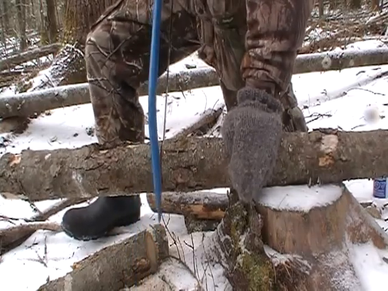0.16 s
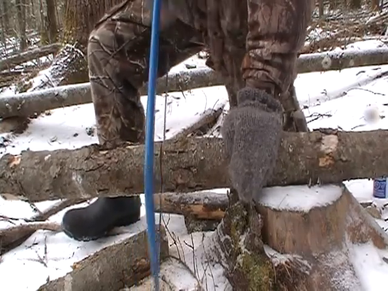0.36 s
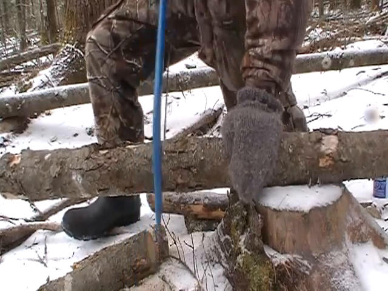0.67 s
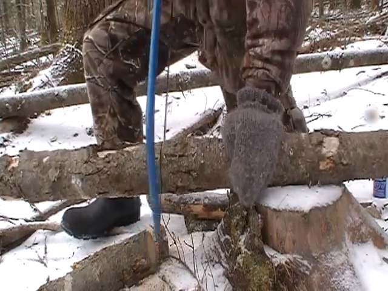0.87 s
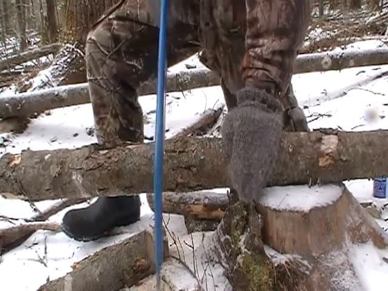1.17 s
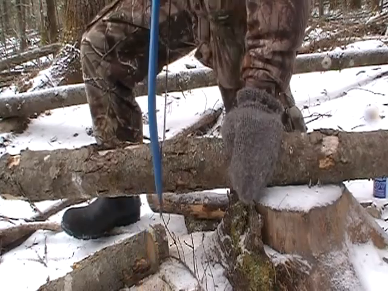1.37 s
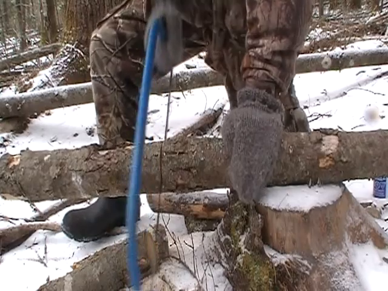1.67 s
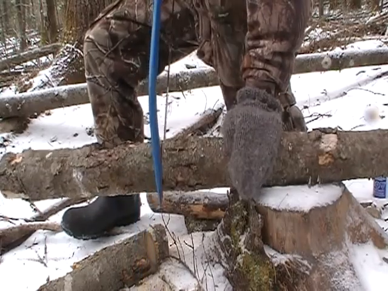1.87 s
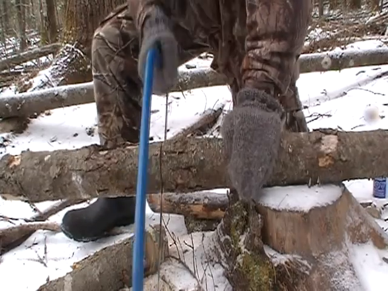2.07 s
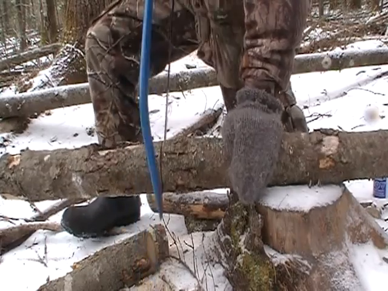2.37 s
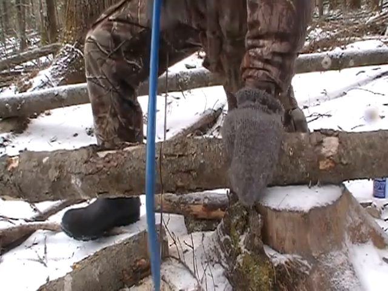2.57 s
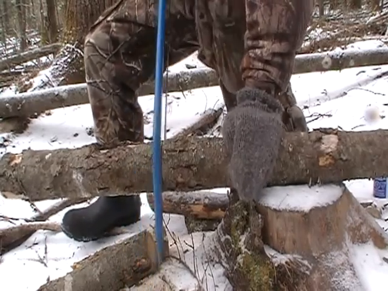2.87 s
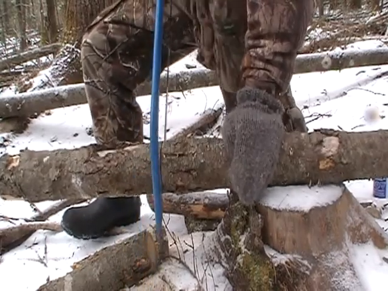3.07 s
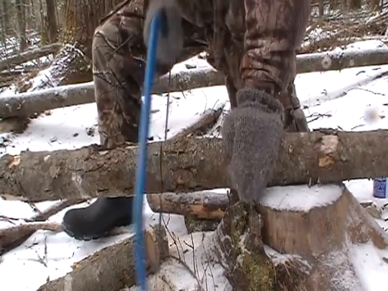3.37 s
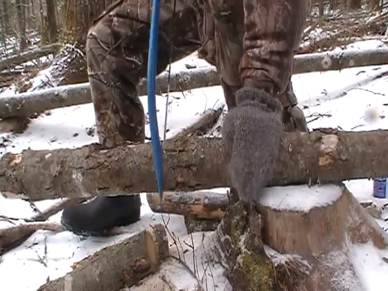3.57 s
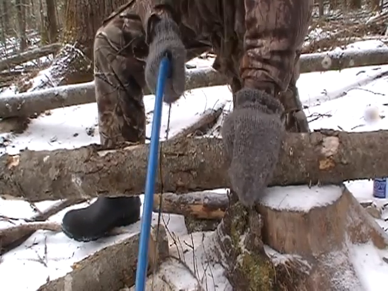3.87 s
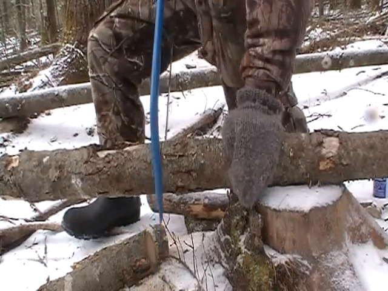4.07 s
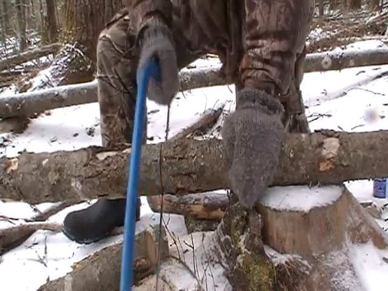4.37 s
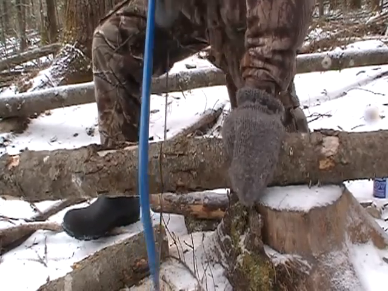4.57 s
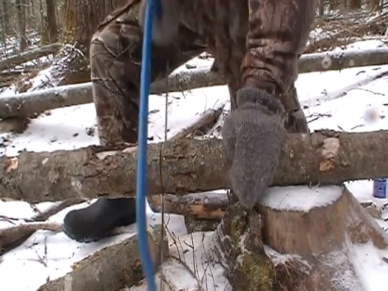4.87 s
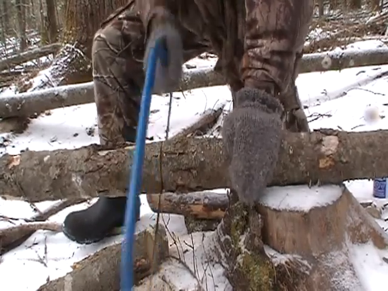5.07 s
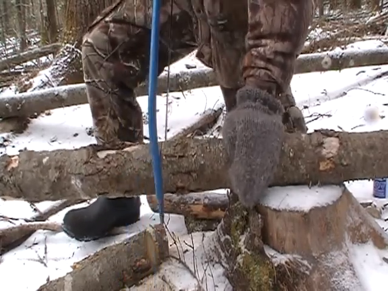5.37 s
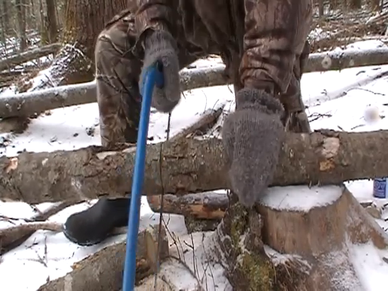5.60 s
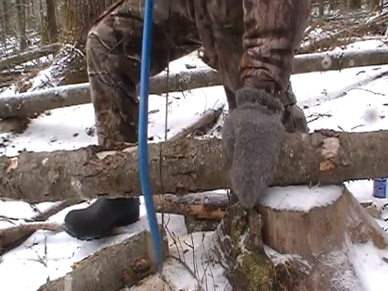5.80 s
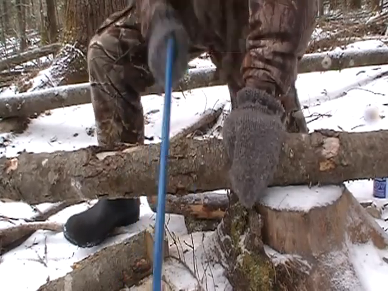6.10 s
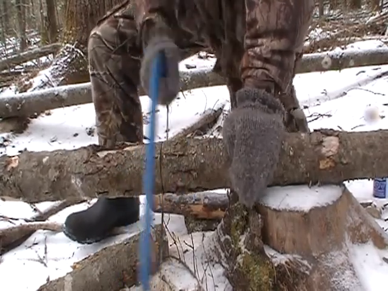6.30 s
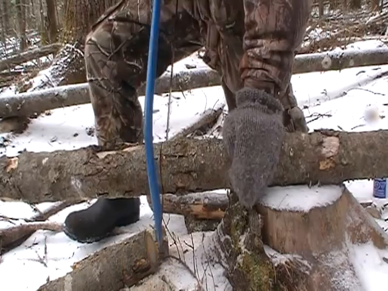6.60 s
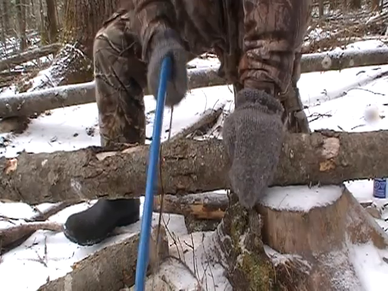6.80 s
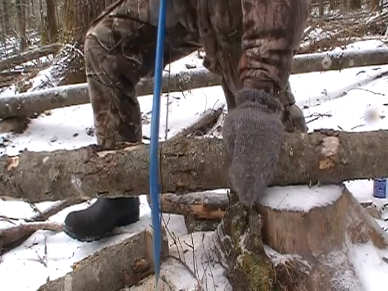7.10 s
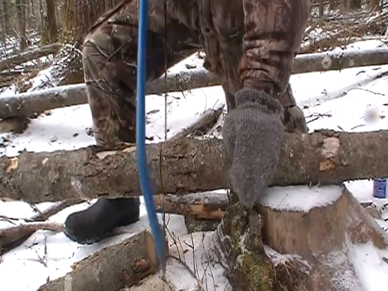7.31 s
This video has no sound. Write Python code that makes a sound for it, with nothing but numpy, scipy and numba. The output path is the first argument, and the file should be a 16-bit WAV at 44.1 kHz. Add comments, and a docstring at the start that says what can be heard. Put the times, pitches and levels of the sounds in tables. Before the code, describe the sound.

Close, quick hand sawing of a log: bright hissing steel, coarse woody rasp, a low growl on hard strokes, small cracks and clicks.

```python
"""Bow saw in a log

A bow saw cuts through a log in quick push-pull strokes, with the faint air of the woods around it.
The pressure of the teeth, roughened by snapping fibres, hisses in the steel blade, rasps in the wood
and drives a boom of the log whose pitch sinks overall as the cut deepens. Snags and splinters add short
bursts and clicks. In firm, fast strokes part of the boom turns into a low note; soft knocks come from the log."""
import sys
import numpy as np
from scipy import signal
from scipy.fft import rfft, irfft
from scipy.io import wavfile
from scipy.ndimage import uniform_filter1d, minimum_filter1d
from numba import njit

SR = 44100
rng = np.random.default_rng(int(sys.argv[2]) if len(sys.argv) > 2 else 0)


def int16_out(signal):
    """Quantize to a 16-bit WAV file."""
    q = np.round(np.clip(np.atleast_2d(signal).T, -1, 1) * 32767)
    wavfile.write(sys.argv[1], SR, q.astype(np.int16))


N = 328545


def undb(db):
    """Decibels to gain."""
    return 10 ** (np.asarray(db) / 20)


def unit(x):
    """Scale to rms 1."""
    return x / np.sqrt(np.mean(x ** 2))


def curves(table):
    """Join the rows of a table by straight lines: each column after the time, one value a sample."""
    seconds, *columns = np.transpose(table)
    return [np.interp(np.arange(N) / SR, seconds, column) for column in columns]


def response(points, size=2048):
    """Causal (minimum-phase) impulse response with the given (Hz, dB) spectrum."""
    hz, db = np.transpose(points)
    bin_hz = np.arange(size // 2 + 1) * SR / size
    log_gain = np.log(undb(np.interp(np.log(bin_hz + 1), np.log(hz), db)))
    # folding the cepstrum onto positive times makes the response causal
    cepstrum = irfft(log_gain)
    cepstrum[1:size // 2] *= 2
    cepstrum[size // 2 + 1:] = 0
    return irfft(np.exp(rfft(cepstrum)))


def through(force, impulse):
    """Play a force through an impulse response scaled to unit energy."""
    return signal.fftconvolve(force, impulse / np.linalg.norm(impulse))[:N]


@njit
def resonance(x, hz, width):
    """Band-pass with a moving centre, gain 1 at the centre."""
    y, band_state, low_state = np.empty(len(x)), 0., 0.
    for i in range(len(x)):
        g, damping = np.tan(np.pi * hz[i] / SR), width / hz[i]
        v = (band_state + g * (x[i] - low_state)) / (1 + g * (g + damping))
        band_state = 2 * v - band_state
        low_state += 2 * g * v
        y[i] = damping * v
    return y


def band(x, hz, width):
    """A resonance that leaves white noise at rms 1."""
    return resonance(x, hz, float(width)) * np.sqrt(SR / (np.pi * width))


def walk(rate):
    """Random levels held 1 / rate s and smoothed twice; spread near 1."""
    hold = int(SR / rate)
    held = np.repeat(rng.standard_normal(2000), hold)[:N]
    return 1.3 * uniform_filter1d(uniform_filter1d(held, hold), hold)


# Colour of the faint air in the woods. Each row: frequency in Hz, relative level in dB.
AIR_SPECTRUM = [(25, -5), (70, -1), (120, 8), (300, -9.5), (1000, -8), (3000, -22), (9000, -13),
                (16000, -19)]


def woods_air():
    """Steady noise, shaped to the spectrum of the air in the woods."""
    return undb(-62.0) * through(rng.standard_normal(N), response(AIR_SPECTRUM))


# The log rocks against the stump. Each row: start in seconds, peak level in dB, pitch in Hz.
BUMPS = [(.255, -53.5, 110), (3.51, -47, 129), (4.141, -47, 123), (4.29, -56, 40.03), (5.285, -50, 143),
         (7.157, -40, 145.9), (7.305, -53, 45)]


def bumps(swell_s=0.011):
    """Soft, deep knocks as the log rocks on the stump: sine tones that swell and die away."""
    t, out = np.arange(N) / SR, np.zeros(N)
    for start, db, hz in BUMPS:
        age = np.maximum(t - start, 0)
        envelope = age / swell_s * np.exp(1 - age / swell_s)
        out += undb(db) * envelope * np.sin(2 * np.pi * hz * age)
    return out


# Strokes, a light return and a heavy cut by turns. Each row: start in seconds, length in seconds,
# basic gain from start to end in dB, then mid-stroke force levels in dB for blade, wood and log.
STROKES = [(-0.035, 0.25, 2, -26, -38.5, -39.0), (0.25, 0.25, 18, -18.0, -28.5, -36),
           (0.5, 0.28, 5.5, -27.5, -39.5, -41), (0.775, 0.28, 11.5, -16, -26, -31.0),
           (1.061, 0.265, -9, -26, -40, -41), (1.328, 0.27, 9, -16.0, -27, -33.5),
           (1.612, 0.24, 2, -24.5, -38.5, -39.5), (1.87, 0.27, 13.5, -22.0, -32, -39.5),
           (2.159, 0.24, 28, -36.5, -45.5, -52.5), (2.429, 0.29, 22.5, -18.5, -29, -36),
           (2.735, 0.24, -9, -27.5, -39, -39), (2.979, 0.32, 10.5, -24.5, -33, -38),
           (3.299, 0.27, 5, -28.5, -37.5, -43.5), (3.556, 0.309, 21, -19.5, -29.5, -34),
           (3.882, 0.27, -12, -27, -37.5, -38), (4.125, 0.32, 8.5, -25, -33.5, -38),
           (4.451, 0.27, 10, -33.5, -41, -43.5), (4.702, 0.32, 13.5, -20.5, -31.5, -33.5),
           (5.035, 0.3, 1, -25.5, -35, -38.5), (5.307, 0.3, -4, -20.5, -30.5, -34.5),
           (5.634, 0.3, 8, -34.5, -46, -48.5), (5.944, 0.25, 10.5, -17.5, -26, -25.5),
           (6.306, 0.22, 15, -26, -34.0, -36.5), (6.576, 0.35, 6, -18, -25.5, -28),
           (6.923, 0.38, -18.5, -30.5, -41, -40), (7.225, 0.39, -17, -28.5, -35, -43)]
# The arm slows overall as the cut deepens. Each row: time in seconds, tooth spacings a second at mid-stroke.
PACE = [(.4, 390), (.95, 372), (1.5, 378), (2.05, 312), (3.8, 299), (4.9, 292), (7.45, 292)]


def motion():
    """Speed of the blade (0-1) and its travel in tooth spacings; it is fastest at mid-stroke."""
    turns = [stroke[0] for stroke in STROKES] + [STROKES[-1][0] + STROKES[-1][1]]
    stroke_count = np.interp(np.arange(N) / SR, turns, np.arange(len(turns)))
    speed = np.abs(np.sin(np.pi * stroke_count))
    return speed, np.cumsum(speed * curves(PACE)[0] / SR)


# Loudness grows as a power of the blade's speed. One row for a return, one for a cut:
# exponents (no unit) for blade, wood and log.
SPEED_POWER = [(1.0, .95, 0.52), (1.73, 2.07, 1.0)]
# Extra gain from start to end of a stroke. One row for a return, one for a cut: dB for blade, wood and log.
LATE_DB = [(-5, -7, 3.9), (5.5, -0.8, 1.5)]
# The blade binds in the cut and is forced through. Each row: peak time in seconds, half length in seconds
# (before the rise and fall factors), then force levels in dB for blade, wood and log.
JAMS = [(0.072, 0.015, -17.5, -30.0, -27), (0.137, 0.0094, -17.5, -28.5, -28),
        (0.169, 0.029, -24.5, -34.5, -35), (0.432, 0.024, -18.5, -27, -46),
        (0.607, 0.02, -22, -33.0, -30.5), (0.717, 0.012, -27, -34.5, -53),
        (1.157, 0.016, -16.5, -30, -25.5), (1.237, 0.013, -25, -34.5, -28.5),
        (1.264, 0.02, -28.0, -45, -32), (1.705, 0.017, -17.5, -27.5, -24), (1.821, 0.009, -30, -55, -44),
        (1.996, 0.021, -18.5, -31.5, -27), (2.246, 0.032, -27, -39.5, -34.5), (2.38, 0.015, -27, -46, -39),
        (2.823, 0.011, -18.5, -29.0, -27.5), (2.88, 0.0083, -19.5, -30, -39),
        (2.936, 0.027, -28, -41, -48.0), (3.082, 0.022, -27, -42, -53), (3.129, 0.016, -16, -26, -37),
        (3.404, 0.018, -21.5, -30, -30), (3.516, 0.01, -38, -41.0, -28), (3.654, 0.015, -32, -35, -38),
        (3.981, 0.0099, -16.5, -23, -30), (4.054, 0.0095, -27, -30, -27.5), (4.281, 0.016, -26, -30, -30.5),
        (4.548, 0.017, -26, -31.5, -25), (4.632, 0.0064, -25.5, -38, -29), (4.799, 0.016, -24, -35, -31),
        (4.854, 0.025, -20.5, -22.0, -45), (4.935, 0.024, -18.5, -29, -28.0), (5.128, 0.022, -20, -26, -33),
        (5.27, 0.028, -29.5, -50, -28.5), (5.416, 0.016, -19, -25, -28.5), (5.769, 0.016, -27, -41.5, -37),
        (5.86, 0.021, -28, -37, -41), (6.376, 0.026, -39, -40, -35.0), (6.462, 0.016, -21.0, -33, -39.0),
        (6.555, 0.028, -28, -42, -35), (6.777, 0.044, -22, -30.0, -16.5), (7.054, 0.023, -18, -24.5, -23),
        (7.164, 0.012, -42, -33.5, -21.5), (7.28, 0.022, -22, -35.5, -32), (7.327, 0.013, -35, -46, -31)]
JAM_RISE, JAM_FALL = 1, 0.88  # a jam builds slower than it clears (in half lengths)
RESTING_DB = (-48.5, -60.5, -56)  # blade, wood and log while the saw turns round
CEILING_DB = (-17.5, -13)  # soft limit on the strokes of wood and log: fully sunk teeth grow no louder
# Near the end of a cut the arm lifts: where and how quickly (shares of the stroke), change of blade hiss (dB)
LET_GO_AT, LET_GO_SPAN, LET_GO_DB = 0.905, 0.013, -15.5
WAVER_DB, WAVER_HZ = (0.56, 0.63, 0.4), 60.6  # uneven grain sways blade, wood and log


def bite():
    """Force levels (dB) of blade, wood and log: strokes swell and fade with speed, jams add short surges."""
    t = np.arange(N) / SR
    power = np.outer(undb(RESTING_DB) ** 2, np.ones(N))
    for k, (start, length, lean_db, *levels_db) in enumerate(STROKES):
        is_cut = k % 2
        near = slice(*np.searchsorted(t, [start, start + length]))
        progress = (t[near] - start) / length
        swell = np.abs(np.sin(np.pi * progress)) ** np.array(SPEED_POWER[is_cut])[:, None]
        lean = undb(np.outer(lean_db + np.array(LATE_DB[is_cut]), progress - .5))
        if is_cut:
            lifted = (1 + np.tanh((progress - LET_GO_AT) / LET_GO_SPAN)) / 2
            swell[0] *= undb(LET_GO_DB * lifted)
        power[:, near] += (undb(levels_db)[:, None] * swell * lean) ** 2
    power[1:] /= np.hypot(1, power[1:] / undb(CEILING_DB)[:, None] ** 2)
    for peak, half, *levels_db in JAMS:
        near = slice(*np.searchsorted(t, [peak - .08, peak + .08]))
        age = (t[near] - peak) / half
        surge = np.exp(-(age / np.where(age < 0, JAM_RISE, JAM_FALL)) ** 2)
        power[:, near] += np.outer(undb(levels_db), surge) ** 2
    return [10 * np.log10(p) + waver_db * walk(WAVER_HZ) for p, waver_db in zip(power, WAVER_DB)]


def seating(blade_db, hold_s=0.064):
    """How well the blade sits in the cut (0-1): a loud cut sinks many teeth, which stay in their groove a while."""
    half = int(hold_s * SR / 2)
    sunk = np.clip((blade_db + 29.5) / 10, 0, 1)
    # the highest value over the last hold_s seconds
    return -minimum_filter1d(-sunk, 2 * half + 1, origin=half)


def teeth(travel, seated, scatter_db=3.0, seated_scatter_db=2.0, grip=0.18, drag=0.45,
          seated_drag=3.2, uneven=.4):
    """Pressure of the teeth: a light blade skips from tooth to tooth, a well seated one cuts evenly."""
    chance = rng.standard_normal(size=(4000, 2))
    contacts = np.cumsum(np.exp(uneven * chance[:, 0]))
    # whole part: which tooth; remainder: how far the blade is on the way to the next
    tooth, phase = np.divmod(np.interp(travel, contacts, np.arange(len(contacts))), 1)
    spread_db = scatter_db + seated * (seated_scatter_db - scatter_db)
    size = undb(spread_db * chance[tooth.astype(int), 1])
    pressure = size * (drag + seated * seated_drag + np.exp(-phase / grip))
    # the arm keeps the mean load steady, however the teeth share it
    return pressure / np.sqrt(uniform_filter1d(pressure ** 2, size=1500))


def fibres(spread_db):
    """Dense snaps of wood fibres: most are tiny, a few large."""
    size_db = np.minimum(rng.exponential(size=N), 5) * spread_db
    return unit(rng.standard_normal(N) * undb(size_db))


def splinters(per_second=110):
    """Sparse, coarse fibres that part with a single click."""
    happens = rng.random(N) < per_second / SR
    size_db = 2 * np.clip(rng.standard_normal(N), -2, 2)
    return happens * np.sign(rng.standard_normal(N)) * undb(size_db)


# A single tooth catches and tears free. Each row: time in seconds, force level in dB,
# length scale in seconds (at least 0.001 is used), force on the wood relative to the blade in dB,
# pitch of the crack in Hz.
SNAGS = [(0.1894, -12.5, 0.0028, -22, 4050), (.264, -38, .0025, -21, 3960), (.34, -18.5, 0.0046, -27, 4050),
         (0.52, -31, 0.0032, -18, 4910), (0.61, -13, 0.002, -12, 3550), (0.622, -18, 0.0022, -20, 3790),
         (0.6917, -15.5, 0.0036, -15, 3190), (0.715, -22, 0.0073, -16, 3700),
         (0.901, -19, .0036, -10, 3560), (0.913, -27, .003, -8, 3140), (1.08, -26, .0017, -21, 4350),
         (1.232, -15.5, 0.0017, -13, 3640), (1.237, -15.5, 0.0028, -11.5, 3830),
         (1.263, -19.5, 0.0035, -12, 3880), (1.402, -19, .004, -16, 3440), (1.422, -21, 0.0046, -21, 3880),
         (1.74, -28, .003, 0.5, 3570), (1.767, -13, 0.0052, -10.5, 3720), (1.789, -18, 0.0032, -9, 3490),
         (1.809, -16.5, 0.0015, -7.5, 3790), (1.82, -29.5, 0.0017, 3, 3650),
         (1.8853, -36.5, 0.0027, -10, 2630), (2.028, -11.5, 0.001, -23, 4950),
         (2.0517, -15, .0015, -15, 3470), (2.075, -12, 0.0013, -15, 3360), (2.221, -21, 0.004, -15, 5170),
         (2.2412, -14.5, 0.0014, -10, 3570), (2.248, -19, 0.0035, -3.3, 3480),
         (2.5096, -24.5, 0.0017, 1.5, 3930), (2.675, -20, 0.0032, -7, 3550), (2.819, -18, .003, -3.5, 3434),
         (2.8754, -19, 0.0036, -1, 3680), (2.906, -20, 0.0014, -11.5, 3490),
         (2.9124, -18, .0066, -14, 3450), (2.946, -25.5, 0.005, -5, 3530),
         (3.0357, -30, 0.0075, -3.5, 4950), (3.123, -16, 0.0042, -28, 3955),
         (3.147, -10, 0.0021, -9.5, 3790), (3.4, -17, 0.0033, -6, 3800), (3.498, -20, 0.0034, -12, 3450),
         (3.518, -19.5, .002, -19, 3500), (3.6572, -16.5, 0.0021, 0, 3100),
         (3.6635, -18, 0.0037, -10, 3600), (3.986, -20, 0.0037, -9, 2840),
         (4.047, -18.5, 0.0026, -3.5, 3470), (4.18, -29.5, .004, -3.5, 3520),
         (4.1942, -11.5, 0.0029, -9, 3040), (4.301, -11, .0033, -20, 3660), (4.543, -25, 0.014, -4, 3630),
         (4.571, -18.5, 0.0017, -11.5, 3380), (4.6956, -31.5, 0.0069, -7.5, 3470),
         (4.7507, -23, 0.0025, -16, 3720), (4.809, -18.5, 0.0059, -9.5, 2440),
         (4.88, -16.5, 0.00095, 1.5, 3400), (5.1116, -17, .0018, -7.5, 3525),
         (5.156, -21, 0.0028, -8, 3860), (5.184, -14, 0.0019, -8, 3380), (5.276, -17, 0.0031, -7.5, 2630),
         (5.42, -13, 0.0022, -5, 3940), (5.462, -10, .0015, -7.5, 2840), (5.476, -15.5, 0.0015, -1, 2930),
         (5.4818, -12, 0.00097, -16, 4010), (5.496, -17, 0.0019, -11, 3470),
         (5.5066, -17.5, 0.0011, -3.5, 2970), (5.532, -14.5, .0028, -14, 3280),
         (5.6521, -30, 0.0034, -8.5, 3140), (5.7524, -18, .0017, -10, 2803),
         (5.801, -20.5, 0.001, -9, 3830), (5.965, -30.5, 0.0021, -8, 2700), (6.213, -35, .002, -25, 4500),
         (6.268, -39, .002, -14, 4500), (6.0096, -17.5, 0.0057, -7, 2580), (6.32, -31, 0.0033, -15, 4790),
         (6.395, -22.5, 0.0089, -22, 3500), (6.4812, -15.5, 0.0056, -8, 3098),
         (6.612, -23, 0.0015, -13, 3530), (6.6228, -22, 0.0045, -3.5, 5100),
         (6.6534, -14, 0.0031, -8.5, 2750), (6.97, -13.5, 0.0015, -11.5, 4902),
         (7.054, -19, 0.009, -7.5, 3470), (7.0833, -14.5, 0.0034, -10, 3830),
         (7.154, -21.5, .0054, -10, 3380), (7.263, -23, 0.0042, -1, 3260),
         (7.313, -10.5, 0.0022, -7.5, 2660), (7.347, -9, 0.00092, -17, 2955)]


def snags(rise=0.31, fall=0.55):
    """Tearing bursts that swell and die within milliseconds: force on blade and wood, gliding crack pitch."""
    t, blade_force, wood_force = np.arange(N) / SR, np.zeros(N), np.zeros(N)
    for time, db, length, crack_db, _ in SNAGS:
        near = slice(*np.searchsorted(t, [time - .03, time + .05]))
        age = (t[near] - time) / max(length, .001)
        rising = np.exp(np.minimum(-age / rise, 20))
        falling = np.exp(np.minimum(age / fall, 20))
        burst = undb(db) / (rising + falling) * 2
        blade_force[near] += burst
        wood_force[near] += burst * undb(crack_db)
    tearing = fibres(spread_db=3.5)
    return blade_force * tearing, wood_force * tearing, curves(SNAGS)[-1]


def growl(travel, overtone_db=-13, slope_db=-2.0):
    """Evenly spaced teeth shake the log once each: a low note that rises and falls with the stroke."""
    phase = 2 * np.pi * (travel + 0.018 * walk(90))
    note = undb(2.7 * walk(70)) * np.sin(phase)
    for k in range(2, 5):
        note += undb(overtone_db + slope_db * (k - 3) + walk(60)) * np.sin(k * phase)
    return np.sqrt(2) * note


# Two bending resonances of the log, sinking overall as the cut deepens. Each row: time in seconds,
# lower pitch in Hz, upper pitch in Hz, upper level relative to the lower in dB.
LOG_MODES = [(0, 270, 426, -0.5), (1.05, 300, 393, -5.5), (1.7, 290, 404, 4), (2.1, 302, 391, -6),
             (4.2, 295.5, 390, -6.5), (5.3, 265.5, 349, -9), (6.7, 264, 366, -13),
             (7.45, 235.5, 363.5, -10.5)]
# Colour of the log's dull thud. Each row: frequency in Hz, relative level in dB.
THUD_SPECTRUM = [(25, -38), (70, -24), (95, -21), (125, -6), (160, -41), (220, -7), (300, 6.5), (400, -0.5),
                 (550, 3), (800, -2), (2000, -36)]


def log(force, width_hz=42.6, upper_width_hz=48.0, skirt_hz=198.0, after_width_hz=26):
    """The log booms at two bending resonances over a dull thud; narrower ones ring on after the teeth."""
    lower_hz, upper_hz, upper_db = curves(LOG_MODES)
    # a second, wider resonance trims the skirts of each
    lower = resonance(band(force, lower_hz, width_hz), lower_hz, float(skirt_hz))
    upper = resonance(band(force, upper_hz, upper_width_hz), upper_hz, float(skirt_hz))
    boom = (lower + undb(upper_db) * upper) / np.hypot(1, undb(upper_db))
    after = band(force, lower_hz, after_width_hz) + undb(upper_db) * band(force, upper_hz, after_width_hz)
    thud = through(force, response(THUD_SPECTRUM))
    return undb(-2.0) * boom + undb(-14) * after + undb(-7.5) * thud


# Higher resonances of the log. Each row: pitch in Hz (before drift), width in Hz,
# relative level in dB while the cut is shallow, relative level in dB once it is deep.
WOOD_MODES = [(524, 39, -5, -4.5), (621, 30, 0, -5), (886, 84, -25, 5.5), (897, 52, -17, 8.5),
              (977, 146, 1, 1.5), (1126.4, 39.7, 11, 11.5), (1285, 45, 1.5, -8), (1414, 38.5, 7.5, 5.5),
              (1676, 56, -0.5, -8), (1825, 23, 2.5, 1.5), (1990, 74, -8, -11), (2264, 39, 5, 2),
              (2816, 280, -16, -9.5), (3133, 50, -0.5, -18), (3390, 380, -9, -10)]
# Colours of the steady rasp and of the snags' crack. Each row: frequency in Hz, relative level in dB.
RASP_SPECTRUM = [(120, -55), (220, -13.5), (400, 2), (600, -18.5), (760, -5), (1000, 2.5), (1700, 0.5),
                 (2400, 4), (3200, -4.5), (4500, -3), (8000, -18.5)]
CRACK_SPECTRUM = [(200, -52), (1000, -13), (2000, -6.5), (2600, 0.5), (3100, -1.5), (3500, 3), (4000, 2.5),
                  (4900, -1), (5600, -18), (9000, -23)]
DEEPENING_S = (3.28, 4.473)  # the cut passes the heart of the log (start and end in seconds)


def wood(cutting, snagging, crack_hz, crack_width_hz=630.0, drift=0.013):
    """The cut rasps with hollow log resonances that shift with the point of contact; snags crack."""
    depth = np.interp(np.arange(N) / SR, DEEPENING_S, (0, 1))
    force = cutting + undb(-9.5) * snagging
    hollow = np.zeros(N)
    for k, (hz, width, shallow_db, deep_db) in enumerate(WOOD_MODES):
        contact_db = 1.5 * walk(28)
        # neighbouring resonances have opposite signs
        gain = (-1) ** k * undb(shallow_db + depth * (deep_db - shallow_db) + contact_db)
        hollow += gain * resonance(force, hz * (1 + drift * walk(18)), float(width))
    rasp = through(cutting, response(RASP_SPECTRUM))
    crack = through(snagging, response(CRACK_SPECTRUM))
    pitched_crack = resonance(crack, crack_hz, float(crack_width_hz))
    return undb(-1.5) * rasp + undb(12.5) * hollow + undb(-2) * crack + undb(6.0) * pitched_crack


# Ringing of the taut blade. Each row: pitch in Hz, relative level in dB, time to fall by 60 dB in seconds.
BLADE_MODES = [(8080, -3, .33), (8210, 0, .33), (8387, -6, .3), (8855, -5, .12), (9010, -5, .1),
               (13701, -11, .35), (14416, -20, .3)]
# The blade is let go at the end of a cutting stroke and rings. Each row: time in seconds, pluck level in dB.
RELEASES = [(.475, -53), (1.02, -44), (1.57, -47), (2.111, -42), (2.683, -36), (3.255, -51), (3.832, -38),
            (4.398, -54), (4.985, -41), (6.18, -44), (6.871, -45)]
# Colours of the blade's hiss and of its snags. Each row: frequency in Hz, relative level in dB.
HISS_SPECTRUM = [(1500, -41), (2400, -13.5), (3000, -8.5), (3500, -5.5), (4300, -9.5), (5300, -12),
                 (6500, -6.5), (7800, -2), (9000, -0.5), (9900, -3), (11000, -5.5), (12500, -9),
                 (14000, -12.5), (16000, -18)]
SNAP_SPECTRUM = [(2500, -11), (4500, -31), (5400, -2), (6500, 4), (8000, 7.5), (9200, 9.5), (10500, 1),
                 (13000, -0.5), (16000, -13)]


def blade(cutting, snagging, zing_hz=9160.0, zing_width_hz=1190.0, wander=0.058):
    """The steel strip hisses, zings at a pitch that wanders as it flexes, and rings on through the turns."""
    t = np.arange(SR // 2) / SR
    ring = sum(undb(db - 60 * t / t60) * np.sin(2 * np.pi * hz * t) for hz, db, t60 in BLADE_MODES)
    centre = zing_hz * (1 + wander * walk(45))
    zing = resonance(cutting, centre, float(zing_width_hz))
    zing = resonance(zing, centre, float(zing_width_hz))
    hiss = through(cutting, response(HISS_SPECTRUM))
    snap = through(snagging, response(SNAP_SPECTRUM))
    plucks = np.zeros(N)
    for time, db in RELEASES:
        plucks[int(time * SR)] = undb(db)
    driven_ring = undb(-29) * through(cutting + snagging, ring)
    plucked_ring = signal.fftconvolve(plucks, ring)[:N]
    return undb(-1.5) * hiss + undb(1.5) * snap + undb(5.0) * zing + driven_ring + plucked_ring


def scene():
    """One stroke motion drives blade, wood and log over the faint air of the woods."""
    blade_db, wood_db, log_db = bite()
    speed, travel = motion()
    seated = seating(blade_db)
    pressure = teeth(travel, seated)
    blade_snags, wood_snags, crack_hz = snags()
    splintering = undb(wood_db + 8.5) * (1 - seated / 2) * splinters()
    blade_cutting = undb(blade_db) * pressure * fibres(spread_db=0.9)
    wood_cutting = undb(wood_db) * pressure * fibres(spread_db=3.0)
    # splinters push harder on the blade than on the wood
    saw = blade(blade_cutting, blade_snags + undb(4.5) * splintering)
    saw += wood(wood_cutting, wood_snags + splintering, crack_hz)
    # towards full speed seated teeth fall into step and up to 0.85 of the boom's power becomes a note
    steady = 0.85 * seated * speed ** 4
    saw += log(undb(log_db) * np.sqrt(1 - steady) * pressure * fibres(spread_db=1.5))
    saw += undb(log_db - 2.5) * np.sqrt(steady) * growl(travel)
    # so slim a log radiates little bass
    saw = signal.sosfilt(signal.butter(3, 165, "high", fs=SR, output="sos"), saw)
    return np.tile(saw + bumps() + woods_air(), (2, 1))  # the same sound in both channels


def record(dry):
    """A microphone that clips any peak beyond full scale, then cuts the treble above 15850 Hz."""
    low_pass = signal.ellip(10, .2, 80, 15850, fs=SR, output="sos")
    return signal.sosfilt(low_pass, np.clip(dry, -1, 1))


dry = scene()
out = record(dry)
int16_out(out)
```